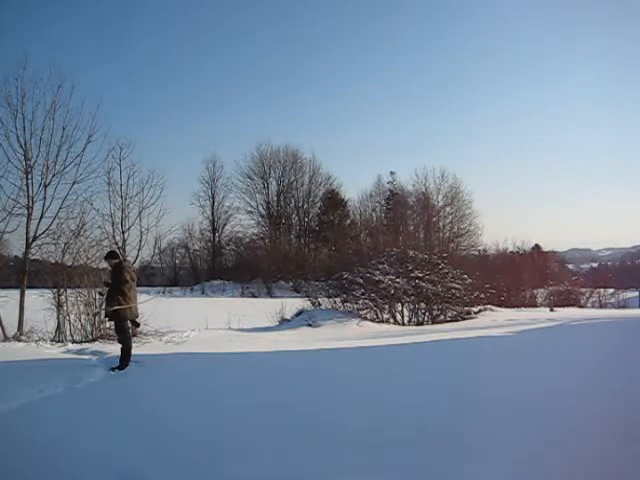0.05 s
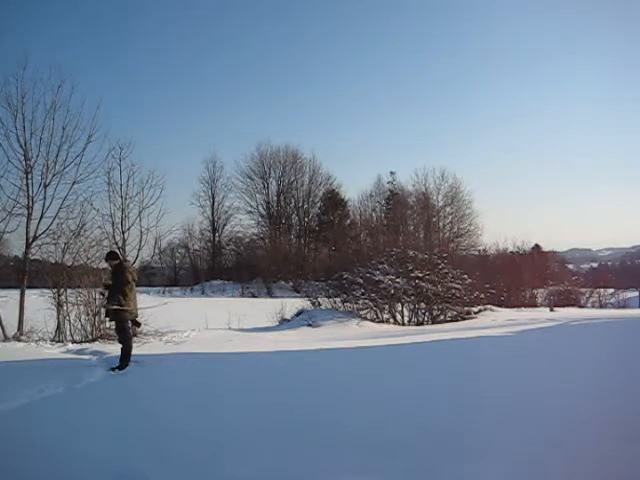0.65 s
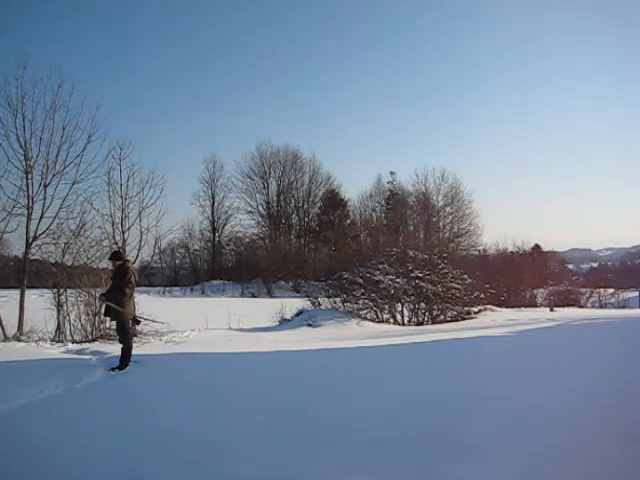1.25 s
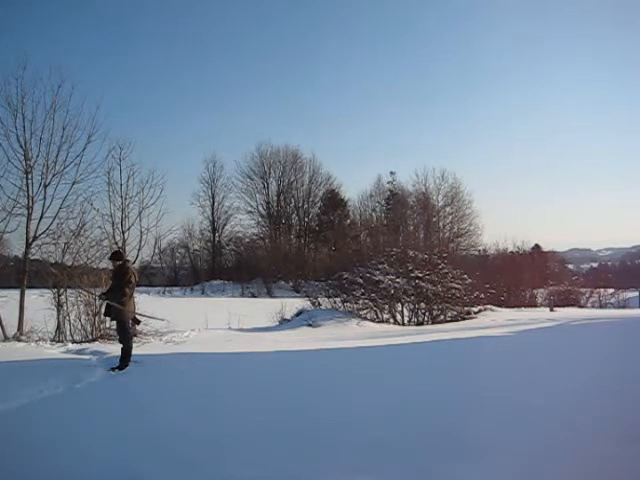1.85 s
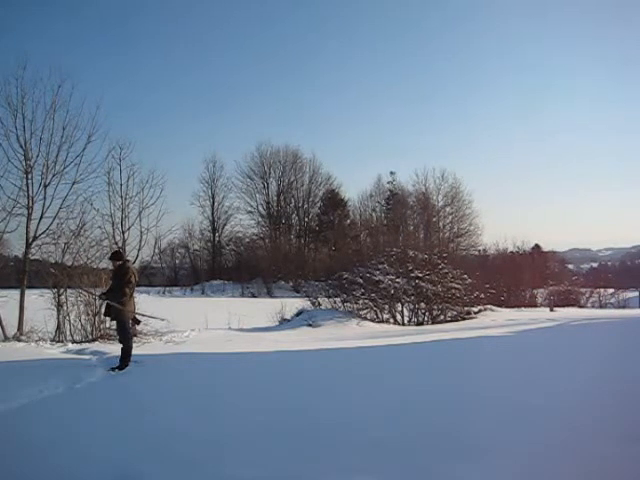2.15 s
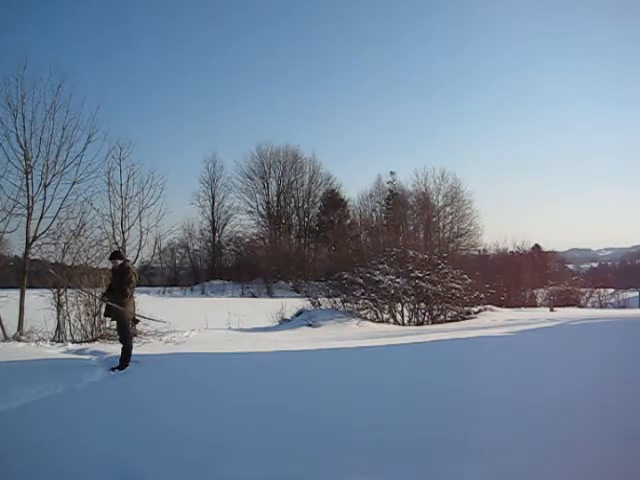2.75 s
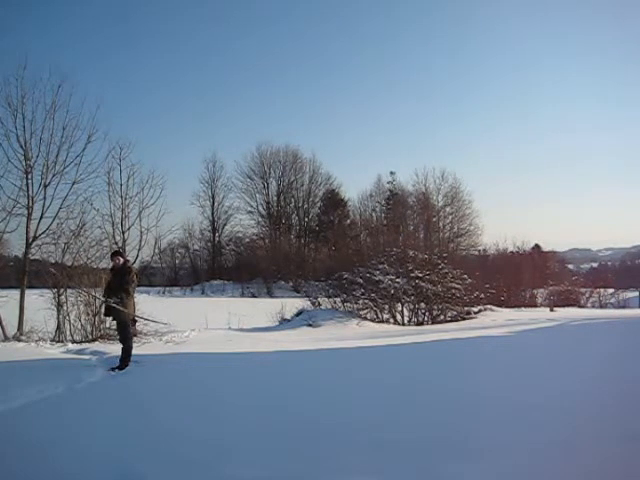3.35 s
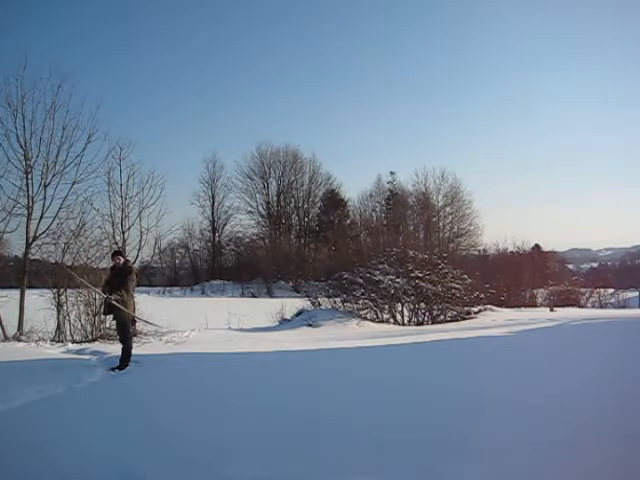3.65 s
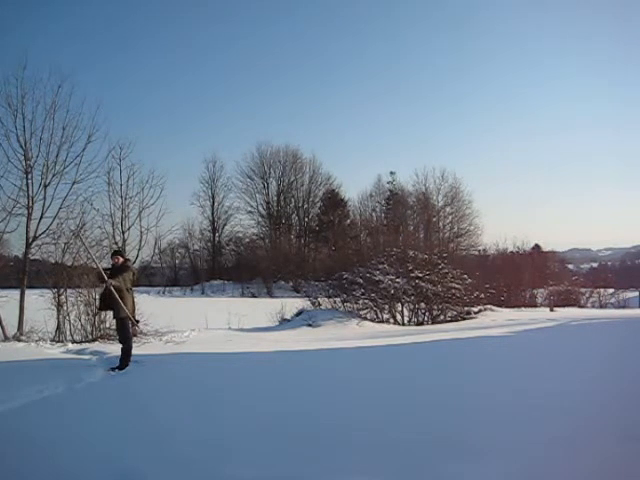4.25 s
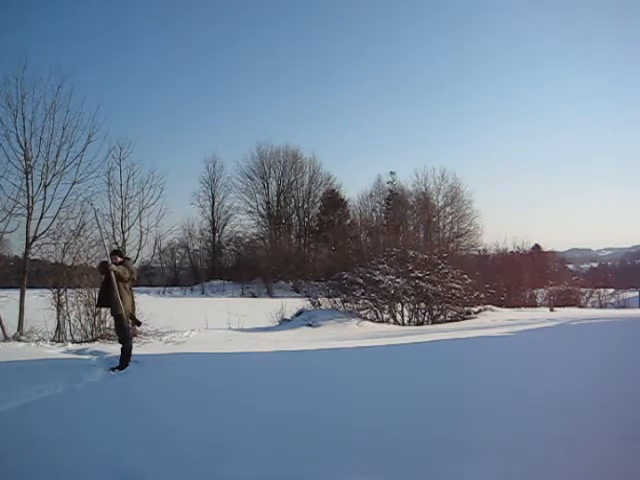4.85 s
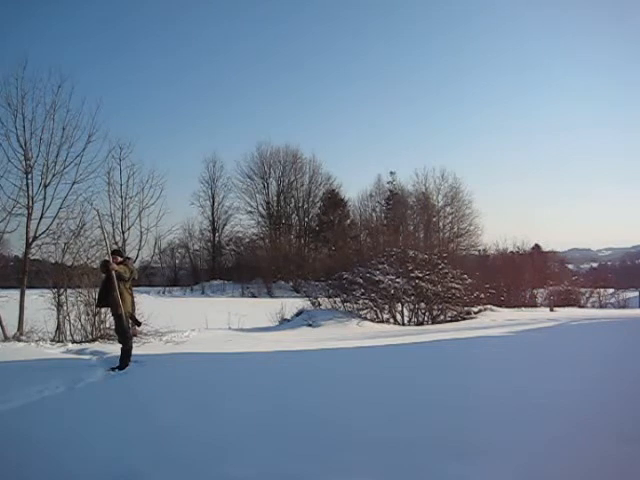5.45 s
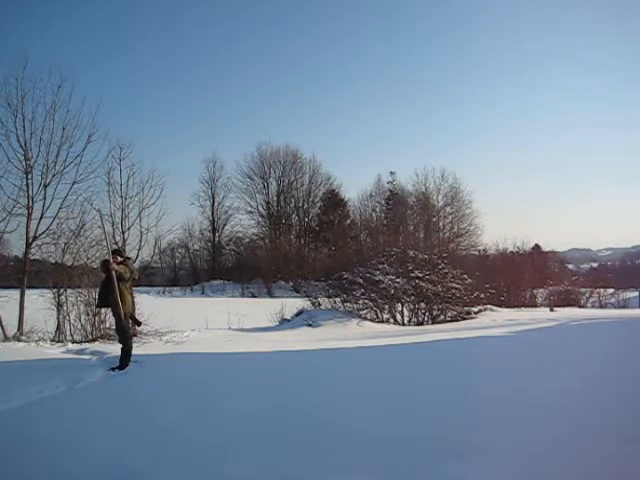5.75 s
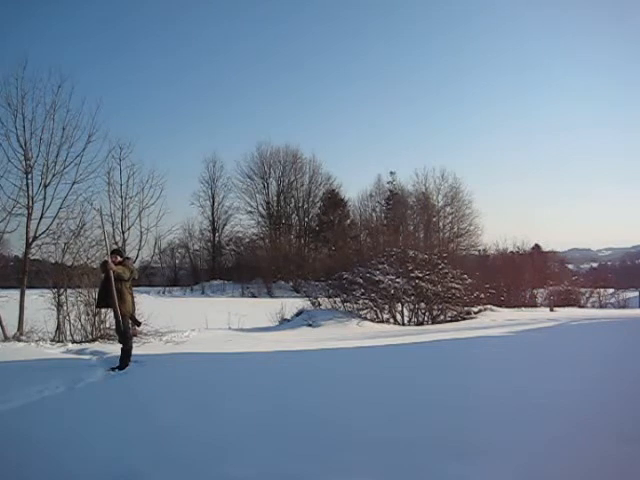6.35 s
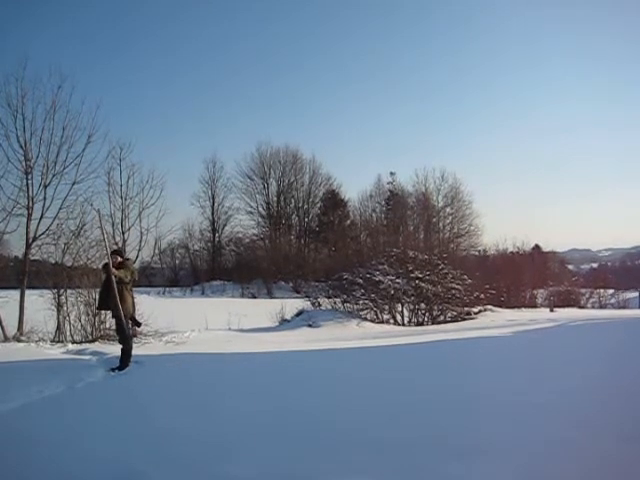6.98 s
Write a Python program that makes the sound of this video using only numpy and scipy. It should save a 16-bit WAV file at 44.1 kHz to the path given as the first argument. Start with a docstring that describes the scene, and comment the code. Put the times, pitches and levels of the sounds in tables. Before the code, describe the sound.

A still, snowy field with almost no echo; soft microphone hiss and a thin, high whine run throughout. Gear ticks lightly several times in the first second and once more near 3.3 seconds. Small birds call faintly far off: three short rising whistles before 1 second, a seesawing call until about 2 seconds, four more whistles from 3.4 to 4 seconds, and scattered single chirps.

At about 6.25 seconds a bowstring is released with two sharp, dry snaps almost together. The arrow hisses rapidly closer, its feathers buzzing, and just before 6.5 seconds it cracks through the snow's crust beside the microphone with a loud, short scrape and a faint low quiver. Loose snow falls back softly around 6.6 seconds as a bird whistles once. From about 6.9 seconds to the end, snow crunches and creaks quietly under a boot.

```python
"""First you hear small birds chirping far off and a few ticks of gear, over a camera's hiss and thin whine.
About six seconds in, an archer on this still, snowy field shoots toward the camera: the string snaps twice.
The arrow hisses closer on fluttering feathers, plunges into the snow and quivers.
Loose snow falls back behind it, and then the snow crunches and creaks under a boot."""
import sys
import numpy as np
from scipy import signal
from scipy.fft import rfft, irfft
from scipy.io import wavfile
from scipy.ndimage import uniform_filter1d

SR = 44100
rng = np.random.default_rng(int(sys.argv[2]) if len(sys.argv) > 2 else 0)


def dump_mix(stems):
    """Bounce the given channels to the path in sys.argv[1] as a 16-bit WAV at rate SR."""
    frames = np.atleast_2d(stems).T  # one column per channel
    limited = np.clip(frames, -1, 1)  # hard clip at full scale
    pcm = np.round(limited * 32767).astype(np.int16)
    wavfile.write(sys.argv[1], SR, pcm)


N = 318402
TIME = np.arange(N) / SR
SHORT_TIME = TIME[:SR // 4]  # a quarter of a second, for brief sounds

# The string is let go, then slaps. A fade time ("t60") is how long a sound takes to drop by 60 dB.
# (time [s], level [dB], rise time [s], fade time [s], low edge [Hz], top edge [Hz],
#  pitch of the bow's arms [Hz], level of their ring [dB])
STRING_SNAPS = [(6.2503, -15, 0.00051, 0.032, 1200, 6130, 2610, -12.5),
                (6.268, -12.3, 0.002, 0.044, 100, 11000, 1290, -16)]
# How strong the low and high parts of each snap are: (frequency [Hz], relative level [dB])
SNAP_TONE = [(88, -49), (150, -15), (320, -27), (445, -14), (1110, -10), (1270, -6), (1420, -10),
             (1630, -3), (2020, -0.5), (2180, -6), (2410, -5), (6230, -11.5), (7860, -16), (8660, -14),
             (15500, -33)]
def bow(arm_t60=0.017, hum_hz=168, hum_db=-50, hum_t60=0.22):
    """Two dry cracks make the bow's arms ring; after the second, the string hums briefly."""
    out, hz = np.zeros(N), frequencies(SHORT_TIME)
    for s, db, rise, t60, low_hz, top_hz, arm_hz, arm_db in STRING_SNAPS:
        between_edges = 1 / np.sqrt((1 + (low_hz / hz) ** 2) * (1 + (hz / top_hz) ** 8))
        noise = irfft(rfft(tiny_clicks()) * between_edges, len(SHORT_TIME))
        crack = amp(db) * shape_tone(noise, SNAP_TONE) * rise_and_fade(SHORT_TIME, rise, t60)
        add(out, s, crack + amp(arm_db) * ring(arm_hz, arm_t60, rise))
    add(out, STRING_SNAPS[-1][0], amp(hum_db) * ring(hum_hz, hum_t60, rise=0.003))
    return out


# The arrow flies straight at a steady speed and just misses the microphone.
LAUNCH_S, PASS_S, SPEED_M_PER_S, MISS_M = 6.271, 6.462, 61, 0.53
FLUTTER_HZ, FLUTTER_EXTRA_HZ, FLUTTER_SETTLE_S = 584, 38, 0.04
# The tone of air on the feathers: (frequency [Hz], relative level [dB])
FEATHER_TONE = [(88, -65), (150, -37), (436, -21), (561, -5.5), (708, -14.5), (877, -5), (1060, -16),
                (1130, -5.5), (1270, -9), (1730, -1.5), (2060, -5), (2270, -0.5), (6600, -9.5),
                (12300, -21), (15500, -35)]
def arrow_flight(rush_db_at_1m=-20.5, buzz_db_at_1m=-23, start_s=0.0089, stop_s=0.0037):
    """Air rushes over the feathers, whose edges flutter in a rough buzz; both grow as the arrow nears."""
    age = np.maximum(TIME - LAUNCH_S, 0)
    ahead_m = SPEED_M_PER_S * np.maximum(PASS_S - TIME, 0)
    distance_m = np.hypot(ahead_m, MISS_M)
    settling_hz = FLUTTER_HZ + FLUTTER_EXTRA_HZ * np.exp(-age / FLUTTER_SETTLE_S)
    flutter_hz = settling_hz * (1 - 0.025 * (1 - ahead_m / distance_m))  # the pitch dips as it passes
    wobble = 0.02 * slow_noise(N, smooth_samples=50)
    cycles = np.cumsum(flutter_hz * (1 + wobble)) / SR
    # the feathers give off sound best at around 3.6 times the flutter's pitch
    flutter = sum(np.cos(2 * np.pi * (k * cycles + rng.random())) / (1 + np.log2(k / 3.6) ** 2)
                  for k in range(1, 13))
    rush = amp(rush_db_at_1m) * shape_tone(rng.standard_normal(N), FEATHER_TONE) / distance_m ** 0.76
    # the buzz spreads sideways, so it stands out as the arrow comes alongside
    buzz = amp(buzz_db_at_1m) * shape_tone(flutter, FEATHER_TONE) / distance_m ** 1.25
    flying = np.clip(age / start_s, 0, 1) * np.exp(-np.maximum(TIME - PASS_S, 0) / stop_s)
    return (rush + buzz) * flying


# The tone of the shaft rubbing through snow: (frequency [Hz], relative level [dB])
RUBBING_TONE = [(90, -42), (200, -25), (550, -9), (850, -11.5), (1200, -17), (1900, 0.5), (3000, -3.5),
                (3600, -5.5), (5400, -3.5), (6500, -10), (10000, -18), (15500, -33)]
# The snow gives way in jolts: (time [s], level [dB], pitch [Hz], fade time [s])
SNOW_JOLTS = [(6.469, -23.5, 230, 0.041), (6.485, -29.5, 240, 0.029), (6.4865, -20, 856, 0.022),
              (6.4925, -30, 190, 0.055)]
def arrow_landing(plunge_s=6.4635, slide_s=0.018, stick_t60=0.024, crust_s=6.4662):
    """The tip cracks the snow's crust and rings the shaft, which scrapes in, jolts to a stop and quivers."""
    age = np.maximum(TIME - plunge_s, 0)
    # the rubbing peaks at once, weakens as the arrow slows and ends when it sticks
    slowing = rise_and_fade(age, rise=0.0045, t60=0.092)
    sticking = np.exp(-np.log(1000) * np.maximum(age - slide_s, 0) / stick_t60)
    rubbing = shape_tone(crackle(per_s=7400, spread_db=3.0), RUBBING_TONE)
    out = amp(-6.5) * rubbing * slowing * sticking
    crust_crack = amp(-3.5) * burst(hz=7500, octaves=0.36, t60=0.016, rise=0.00079)
    shaft_ring = amp(-15) * ring(hz=2840, t60=0.055)
    add(out, crust_s, crust_crack + shaft_ring)
    for s, db, hz, t60 in SNOW_JOLTS:
        add(out, s, amp(db) * ring(hz, t60))
    quiver = amp(-42) * burst(hz=150, octaves=0.98, t60=0.27, rise=0.006)
    add(out, SNOW_JOLTS[-1][0], quiver)
    return out


# The tone of crunching crystals: (frequency [Hz], relative level [dB])
CRUNCH_TONE = [(500, -32), (1000, -5), (2100, -1), (3900, -1), (4800, -6), (6000, 0), (7500, -6),
               (9000, -4.5), (11000, -14), (15000, -25)]
# Snow falls back behind the arrow, then shifts under a boot:
# (middle time [s], spread in time [s], crunch level [dB], scrape level [dB])
SNOW_SHIFTS = [(6.585, 0.072, -49.5, -64), (6.96, 0.15, -59, -63), (7.075, 0.043, -51.5, -54),
               (7.203, 0.026, -41.5, -53)]
# The loudest creaks: (time [s], level [dB], middle frequency [Hz])
SNOW_CREAKS = [(6.5055, -40, 5600), (6.648, -42, 3200), (6.668, -40, 3000), (6.7325, -41.5, 3500),
               (6.973, -41, 4200), (7.032, -38, 4000), (7.054, -39, 3500), (7.116, -38, 4500),
               (7.136, -32, 5300), (7.1505, -31.5, 4000), (7.1736, -33.5, 5700)]
def shifting_snow():
    """Moving snow swells and fades with a fine crunch of crystals and a thin scrape; some creaks stand out."""
    crunch = shape_tone(crackle(per_s=4000, spread_db=4.5), CRUNCH_TONE)
    scrape = keep_band(crackle(per_s=3200, spread_db=7.0), hz=3250, octaves=0.15)
    out = np.zeros(N)
    for s, spread_s, crunch_db, scrape_db in SNOW_SHIFTS:
        swell = np.exp(-0.5 * ((TIME - s) / spread_s) ** 2)
        out += (amp(crunch_db) * crunch + amp(scrape_db) * scrape) * swell
    for s, db, hz in SNOW_CREAKS:
        add(out, s, amp(db) * burst(hz, octaves=0.5, t60=0.015))
    return out


# Ticks of gear: (time [s], level [dB], pitch [Hz], fade time [s], click level relative to the ring [dB])
GEAR_TICKS = [(0.2278, -34, 1650, .03, -7.5), (.2415, -41, 1780, 0.045, -13), (.3452, -37, 1880, 0.011, -9),
              (0.373, -46, 1520, 0.022, -4), (0.8063, -30.5, 2720, 0.01, -0.5),
              (3.2553, -37, 1280, 0.016, -2.5)]
def gear_ticks():
    """Small hard parts knock together, each making a click and a short ring."""
    out = np.zeros(N)
    for s, db, hz, t60, click_db in GEAR_TICKS:
        click = amp(click_db) * burst(hz=3000, octaves=0.62, t60=0.89 * t60)
        add(out, s, amp(db) * (ring(hz, t60) + click))
    return out


# One bird's whistles: (time [s], length [s], held pitch [Hz], opening slide [share of the pitch],
#  level [dB], level change over the note [dB])
BIRD_WHISTLES = [(0.554, 0.072, 4410, 0.05, -51.5, 0), (0.724, 0.09, 4350, 0.26, -50, -2),
                 (0.919, 0.082, 4300, 0.28, -48, 0), (3.376, 0.072, 4480, 0.06, -49.5, 0),
                 (3.531, 0.088, 4300, 0.24, -48.5, 0), (3.719, 0.086, 4230, 0.27, -45, 9),
                 (3.934, 0.078, 4250, 0.23, -49.5, -5), (6.579, 0.065, 4340, 0.04, -46.5, 0)]
def whistling_bird(slide_s=0.016, droop_share=0.045, droop_s=0.0139):
    """Each whistle slides up to a pitch, holds it and droops at the end."""
    out = np.zeros(N)
    for s, length, held_hz, slide_share, db, swell_db in BIRD_WHISTLES:
        t = TIME[:round(length * SR)]
        slide = slide_share * (1 - np.tanh(t / slide_s))
        droop = droop_share * np.exp((t - length) / droop_s)
        loudness = amp(db + swell_db * (t / length - 0.5))
        add(out, s, loudness * bird_note(held_hz * (1 - slide - droop)))
    return out


# A second bird's first round: (time [s], length [s], start pitch [Hz], end pitch [Hz], level [dB])
SEESAW_NOTES = [(1.112, 0.03, 5400, 4400, -56), (1.165, 0.048, 3800, 5400, -55)]
def seesaw_bird(rounds=4, every_s=0.217, drop_db=1.3):
    """A bird repeats a falling and a rising note, a little fainter each round."""
    out = np.zeros(N)
    for k in range(rounds):
        for s, length, start_hz, end_hz, db in SEESAW_NOTES:
            add(out, s + k * every_s, amp(db - k * drop_db) * chirp(length, start_hz, end_hz))
    return out


# Single bird calls: (time [s], length [s], start pitch [Hz], end pitch [Hz], level [dB])
STRAY_CHIRPS = [(0.005, 0.041, 3750, 3150, -57), (0.182, 0.034, 3850, 3100, -56),
                (0.355, 0.04, 3850, 3100, -58), (1.37, 0.081, 3200, 4250, -55.5),
                (2.198, 0.035, 3800, 4650, -59), (3.861, 0.0286, 4200, 3450, -50.5),
                (5.415, 0.045, 3600, 5200, -58)]
def stray_birds():
    """Now and then a bird gives one short call that slides up or down."""
    out = np.zeros(N)
    for s, length, start_hz, end_hz, db in STRAY_CHIRPS:
        add(out, s, amp(db) * chirp(length, start_hz, end_hz))
    return out


def chirp(length, start_hz, end_hz):
    """A bird note that slides from one pitch to another, fastest at the start."""
    progress = np.linspace(0, 1, round(length * SR))
    return bird_note(start_hz + (end_hz - start_hz) * progress ** 0.75)


def bird_note(hz, waver=0.0052):
    """An almost pure tone follows a pitch curve, wavering slightly as it swells and fades."""
    drift = slow_noise(SR, smooth_samples=150)[:len(hz)]
    swell = abs(np.sin(np.linspace(0, np.pi, len(hz)))) ** 0.4
    return np.sin(2 * np.pi * np.cumsum(hz * (1 + waver * drift)) / SR) * swell


def tree_echo(sound, t60):
    """Trunks and bushes bounce back a thin echo."""
    echoes = tiny_clicks(gap_samples=24) * rise_and_fade(SHORT_TIME, rise=0.012, t60=t60)
    return signal.oaconvolve(sound, echoes / np.linalg.norm(echoes))[:N]


# The hiss of open air and the microphone: (frequency [Hz], relative level [dB])
AIR_TONE = [(12, -34), (20, -7), (177, -2.5), (361, -1.5), (398, -2.5), (428, -1), (547, -1.5), (649, -2),
            (790, -2), (5610, -6.5), (7000, -10.5), (9100, -36), (15400, -120)]
# The camera's high, uneven hiss: (frequency [Hz], relative level [dB])
CAMERA_TONE = [(5500, -49), (7200, 0), (9200, -2), (10200, 3.5), (10900, 0.5), (11900, -4.5), (12900, -0.5),
               (13300, -8.5), (14100, 4), (15000, -5.5), (15700, -8.5)]
# Steady tones from the camera's electronics: (pitch [Hz], level [dB])
CAMERA_WHINE = [(7559.8, -63.5), (7589, -81), (15121, -72), (15150, -70.5)]
def hiss_and_whine(air_db=-53.5, camera_db=-57.5):
    """Still air and the microphone hiss softly; the camera adds a higher hiss and a thin whine."""
    air = amp(air_db) * shape_tone(rng.standard_normal(N), AIR_TONE)
    camera = amp(camera_db) * shape_tone(rng.standard_normal(N), CAMERA_TONE)
    whine = sum(amp(db) * np.sqrt(2) * np.sin(2 * np.pi * (hz * TIME + rng.random()))
                for hz, db in CAMERA_WHINE)
    return air + camera + whine


def ring(hz, t60, rise=0.00038):
    """One fading tone from something struck."""
    return np.sin(2 * np.pi * hz * SHORT_TIME) * rise_and_fade(SHORT_TIME, rise, t60)


def burst(hz, octaves, t60, rise=0.00011):
    """A short, dry noise around one frequency."""
    return keep_band(tiny_clicks(), hz, octaves) * rise_and_fade(SHORT_TIME, rise, t60)


def crackle(per_s, spread_db):
    """Snow crystals break at random, a few of them loudly."""
    sizes = amp(spread_db * np.minimum(rng.exponential(1, N), 4))
    return sizes * rng.choice([-1., 1.], N) * (rng.random(N) < per_s / SR)


def tiny_clicks(gap_samples=8):
    """A dense, even spray of clicks, one in every few samples."""
    clicks = np.zeros(len(SHORT_TIME))
    slots = np.arange(0, len(clicks) - gap_samples, gap_samples)
    clicks[slots + rng.integers(0, gap_samples, len(slots))] = rng.choice([-1., 1.], len(slots))
    return clicks


def slow_noise(samples, smooth_samples):
    """A smoothed random wander."""
    return normalise(uniform_filter1d(rng.standard_normal(samples), size=smooth_samples))


def rise_and_fade(t, rise, t60):
    """Loudness that climbs for `rise` seconds and falls by 60 dB every `t60` seconds."""
    return np.clip(t / rise, 0, 1) * np.exp(-np.log(1000) * t / t60)


def shape_tone(x, points):
    """Turns parts of x up or down along (frequency [Hz], level [dB]) points, then normalises."""
    hz, db = np.transpose(points)
    gains = amp(np.interp(np.log(frequencies(x)), np.log(hz), db))
    return normalise(irfft(rfft(x) * gains, len(x)))


def keep_band(x, hz, octaves):
    """Keeps mostly the part of x near one frequency, then normalises."""
    gains = 1 / (1 + (np.log2(frequencies(x) / hz) / octaves) ** 2)
    return normalise(irfft(rfft(x) * gains, len(x)))


def frequencies(x):
    """The frequencies that make up x, raised by 1 Hz to avoid zero."""
    return np.fft.rfftfreq(len(x), 1 / SR) + 1


def normalise(x):
    """Scales x to an average strength (rms) of 1."""
    return x / np.sqrt(np.mean(x ** 2) + 1e-20)


def amp(db):
    """Turns decibels into a number to multiply by."""
    return 10 ** (np.asarray(db) / 20)


def add(mix, s, sound):
    """Mixes a sound in, starting at s seconds."""
    part = mix[round(s * SR):][:len(sound)]
    part += sound[:len(part)]


def scene():
    """Snow swallows nearly all echo; everything reaches one microphone."""
    shot = bow()
    birds = whistling_bird() + seesaw_bird() + stray_birds()
    echo = amp(-9.5) * tree_echo(shot, t60=0.14) + amp(-7) * tree_echo(birds, t60=0.41)
    arrow = arrow_flight() + arrow_landing()
    mono = shot + arrow + birds + echo + gear_ticks() + shifting_snow() + hiss_and_whine()
    return np.array([mono, mono])


def record(dry, limit_db=-21, squeeze=0.32, recover_db_per_s=170, react_s=0.0034, top_hz=15830):
    """Automatic volume dips on the impact and soon recovers; peaks are rounded and the highest treble cut."""
    level_db = 10 * np.log10(abs(uniform_filter1d(dry[0] ** 2, size=100)) + 1e-12)
    fall_db = TIME * recover_db_per_s
    held_db = np.maximum.accumulate(level_db + fall_db) - fall_db  # jumps to each peak, then sinks
    over_db = np.maximum(held_db - limit_db, 0)
    lag = np.exp(-1 / (react_s * SR))
    dip_db = squeeze * signal.lfilter([1 - lag], [1, -lag], over_db)
    dipped = dry / amp(dip_db)
    rounded = 0.7 * np.tanh(dipped / 0.7)
    treble_cut = signal.firwin(511, top_hz, window=("kaiser", 9), fs=SR)
    return signal.oaconvolve(rounded, treble_cut[None], "same")


dry = scene()
out = record(dry)
dump_mix(out)
```